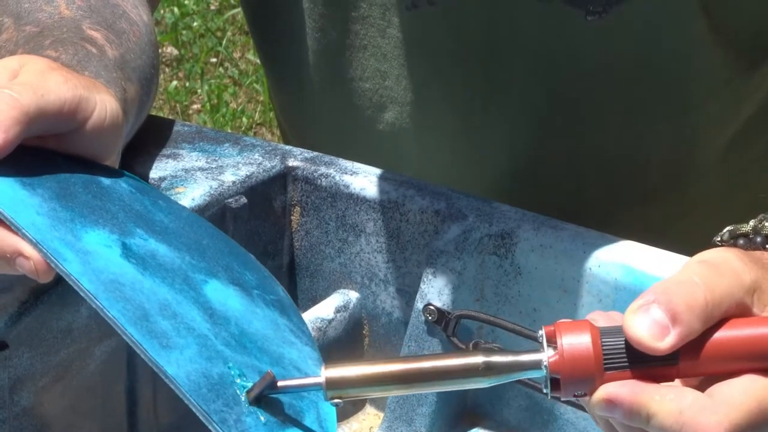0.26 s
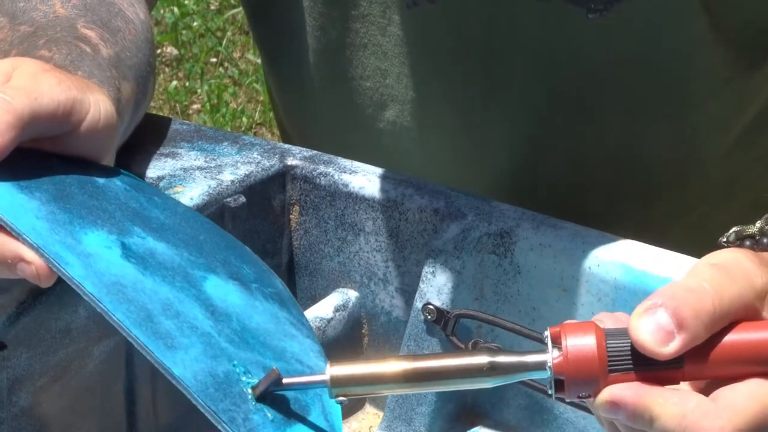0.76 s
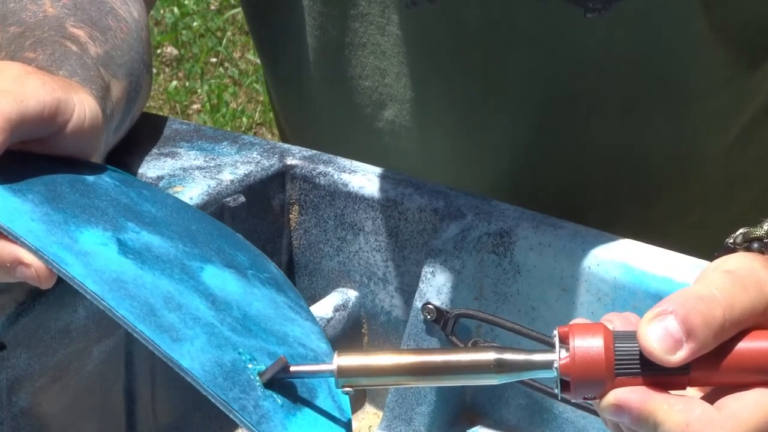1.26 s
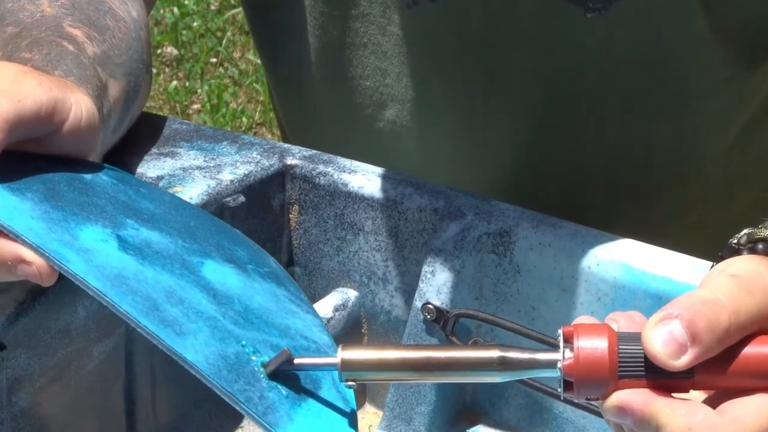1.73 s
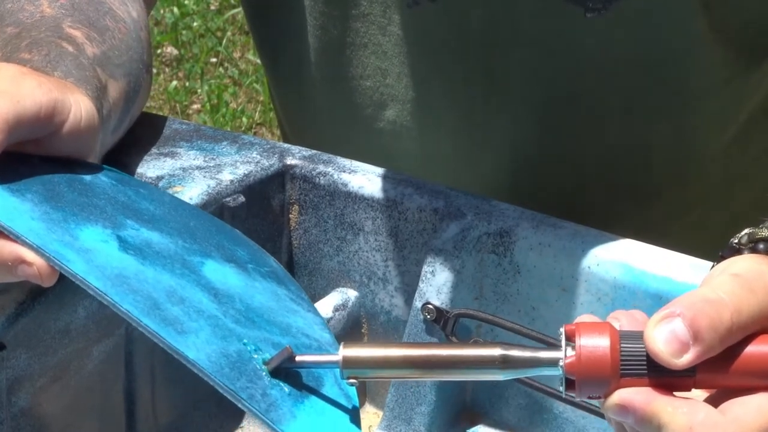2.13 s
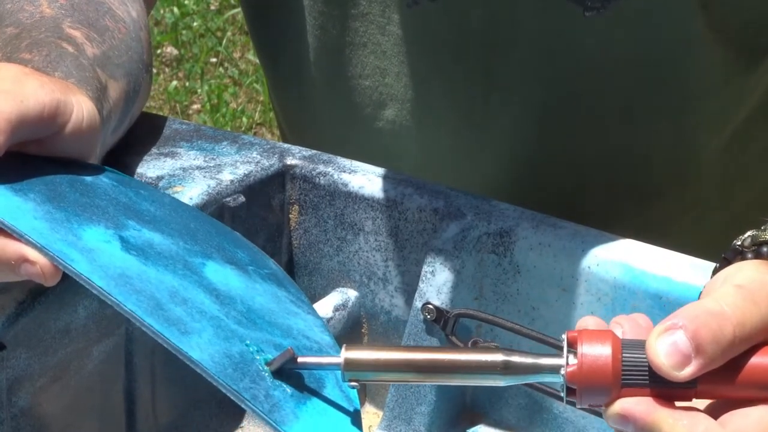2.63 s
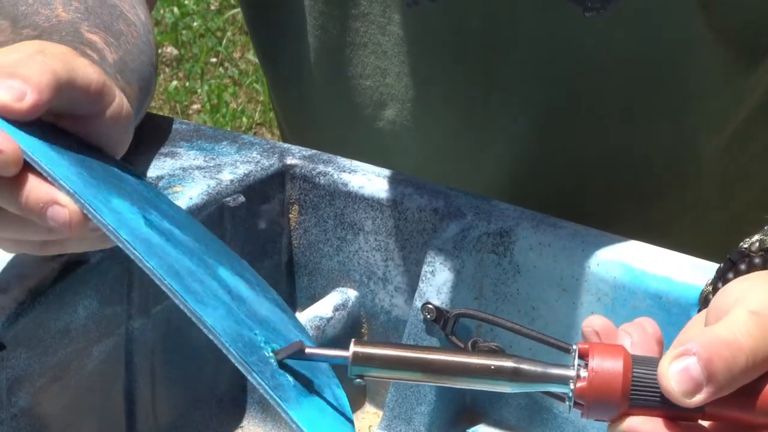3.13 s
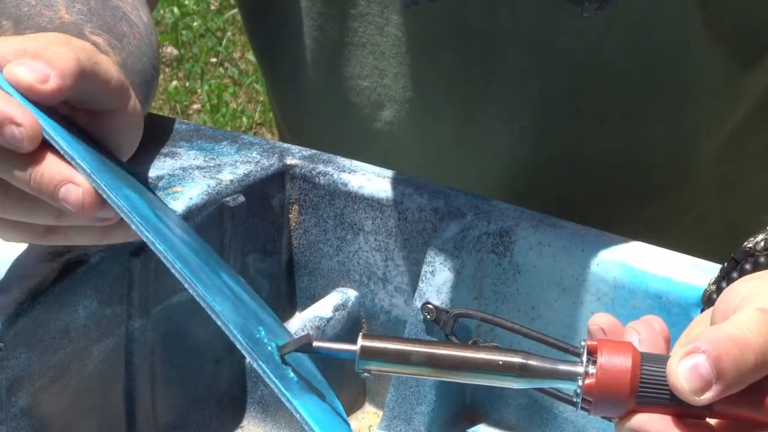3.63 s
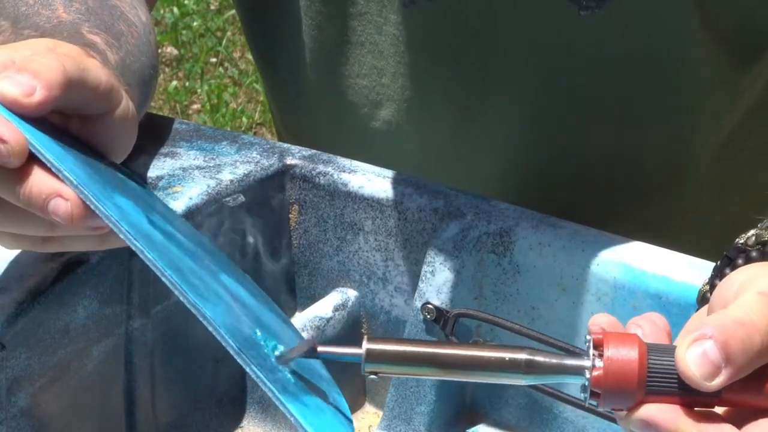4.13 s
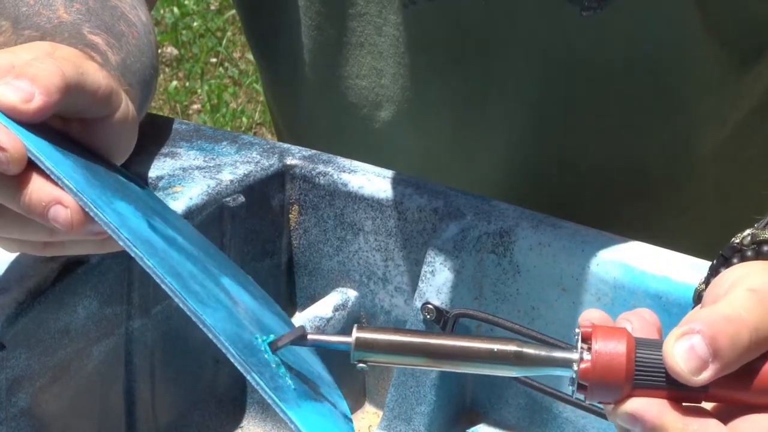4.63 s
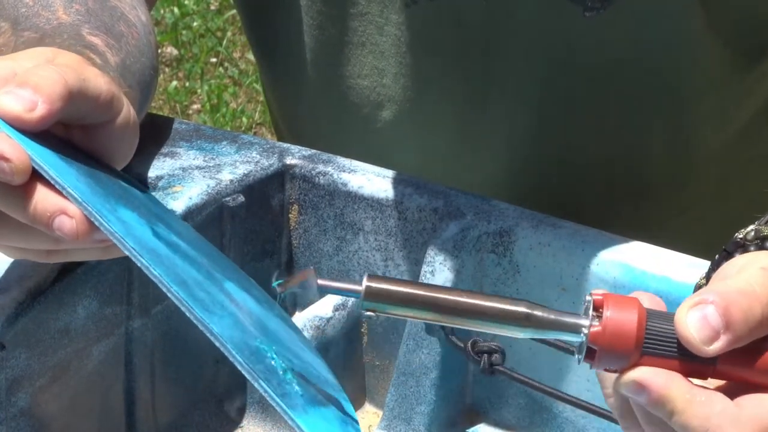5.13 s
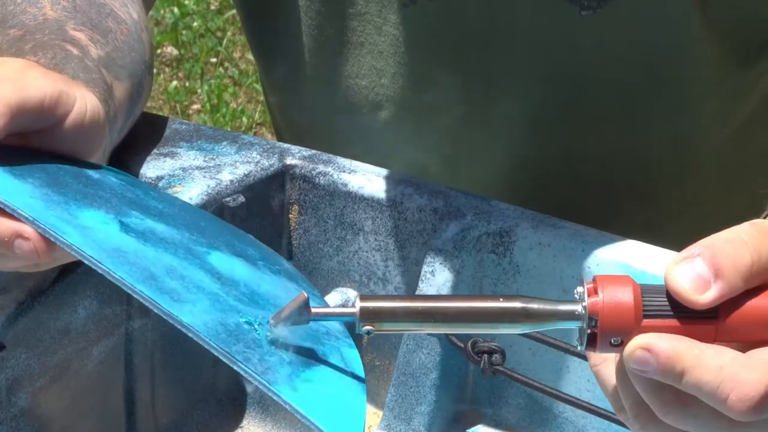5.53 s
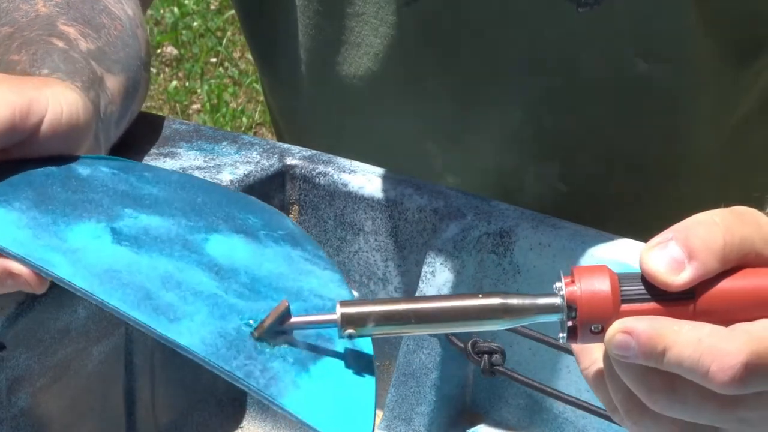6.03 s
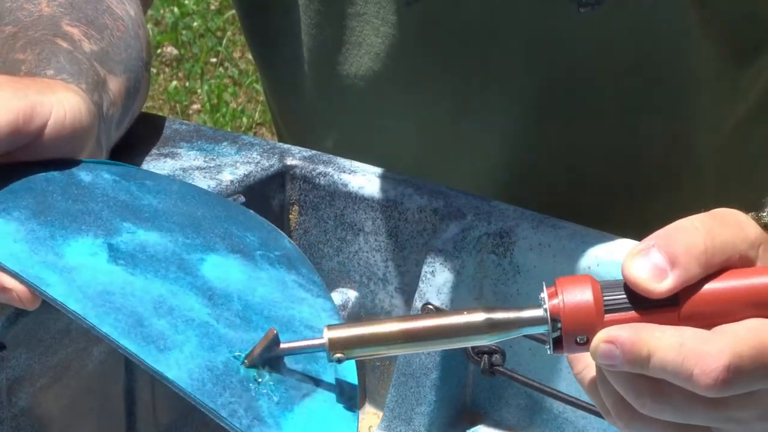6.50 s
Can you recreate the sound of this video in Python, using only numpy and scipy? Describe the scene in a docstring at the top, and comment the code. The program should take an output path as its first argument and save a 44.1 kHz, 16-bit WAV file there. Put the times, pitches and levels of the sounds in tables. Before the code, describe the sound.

Lively bird song echoes softly among trees over a faint leafy wash, interrupted once by a hard, close snap mid-way.

```python
"""Songbirds round a quiet yard

Songbirds call from trees round a yard where someone works on a plastic panel with a soldering iron, itself unheard.
Slurred whistles, chips and trills are gliding tones, each with a direct path, one reflection and tree echoes.
One sharp click close by is a set of damped modes with a noise crack; the hands' soft bumps are dull noise pulses.
Faint lower calls come from far away, over shaped noise for leaves and far-off sound."""
import sys
import numpy as np
from scipy import signal
from scipy.fft import rfft, irfft
from scipy.io import wavfile

SR = 44100
rng = np.random.default_rng(int(sys.argv[2]) if len(sys.argv) > 2 else 0)


def bounce(signal):
    """Save signal as a 16-bit WAV file at the path given by the first command-line argument."""
    frames = np.transpose(np.atleast_2d(signal))
    limited = np.clip(frames, -1, 1)
    pcm = np.round(limited * 32767).astype(np.int16)
    wavfile.write(sys.argv[1], SR, pcm)


N = 298102  # samples

FREQS = np.maximum(np.arange(N // 2 + 1) * SR / N, 1)  # Hz
SIDES = np.array([[1], [-1]])  # left and right sign of the side signal
# pitch unsteadiness of the song, as a share of the pitch, for a direct path of 0 dB
SONG_WARBLE = 0.025
LARGE_BIRD_BELOW_HZ = 3800


def undb(db):
    """Decibels to gain."""
    return 10 ** (np.asarray(db) / 20)


def unit(x):
    """Scale to rms 1."""
    return x / np.sqrt(np.mean(x ** 2))


def add(track, s, x):
    """Mix x into the track at s seconds."""
    i = max(int(s * SR), 0)
    track[i:i + len(x)] += x[:max(N - i, 0)]


def colour(x, points):
    """Filter by a spectrum of (f/Hz, level/dB) points, interpolated over log frequency."""
    hz, db = np.transpose(points)
    gain = undb(np.interp(np.log(FREQS), np.log(hz), db))
    return irfft(rfft(x) * gain, N)


def walk(rate):
    """Smooth chance with rms 1, changing about rate times a second."""
    slow = rfft(rng.standard_normal(N)) / (1 + (FREQS / rate) ** 4)
    return unit(irfft(slow, N))


def stereo(mid, side, pan_db):
    """Left and right as the microphone spreads them: least near 1.5 kHz, most round 5 to 7 kHz."""
    # stereo width of the microphone: f/Hz, side gain/dB
    width_curve = [(300, -1), (1500, -11), (2600, -5), (3600, -2.5), (4800, 3), (7000, 4), (10000, -7)]
    return (mid + SIDES * colour(side, width_curve)) * undb(SIDES * pan_db / 2)


def trees(x, early_t60, late_t60, late_db):
    """Mid and side echoes: strong ones from trunks nearby, then a weak tail from further off (t60 in s)."""
    t = np.arange(SR) / SR
    early = undb(-60 * t / early_t60)
    late = undb(late_db - 60 * t / late_t60)
    fade = (early + late) * (1 - np.exp(-t / 0.0009))
    # cubing the noise makes a few echoes stand out
    echoes = rng.standard_normal((2, SR)) ** 3 * fade
    echoes /= np.sqrt(np.sum(echoes ** 2, axis=1, keepdims=True))
    return signal.fftconvolve(x[None], echoes, axes=1)[:, :N]


def birds(notes, warble_rate, flutter_db, edge_s, echo_db, early_t60, late_t60, late_db, side_db, pan_db):
    """Each note is one gliding, warbled tone; foliage shades its direct path apart from its echoes."""
    wall_s, wall_db = 0.017, -16  # one distinct reflection from a surface nearby
    sung, direct = np.zeros(N), np.zeros(N)
    unsteady = walk(warble_rate)
    flutter = undb(flutter_db * walk(59))
    for s, slur_hz, db, direct_db, warble in notes:
        t = np.arange(len(slur_hz)) / SR
        at = (int(s * SR) + np.arange(len(t))) % N
        phase = 2 * np.pi * np.cumsum(slur_hz * (1 + warble * unsteady[at])) / SR
        swell = np.sin(np.pi / 2 * np.clip(np.minimum(t, t[::-1]) / edge_s, 0, 1))
        note = undb(db) * unit(swell * flutter[at] * np.sin(phase))
        add(sung, s, note)
        add(direct, s, note * undb(direct_db))
        add(direct, s + wall_s, note * undb(wall_db))
    mid, side = undb(echo_db) * trees(sung, early_t60, late_t60, late_db)
    return stereo(direct + mid, undb(side_db) * direct + side, pan_db)


def swoops():
    """A swoop swells up to a crest, plunges and bends to its last pitch; the level follows the plunge."""
    climb_fade_db = 15.5  # how much softer a swoop starts than its crest
    plunge_shape = 1.424  # 1 = sharp corner at the crest, 2 = round shoulder
    # main syllables: crest t/s, climb/s, roundness of the climb (1 = straight), first f/Hz, crest f/Hz,
    # trough f/Hz, end f/Hz, plunge/s, crest to end/s, crest level/dB, tail level/dB, direct path/dB
    swoop_rows = [ (0.31, 0.039, 2.2, 3560, 3520, 2383, 2740, 0.012, 0.082, -56.5, -56, 3.5),
                  (0.891, 0.027, 1.2, 2954, 3780, 1880, 2437, .02, 0.105, -50, -56, 3.5),
                  (1.048, .022, 1.26, 2110, 3080, 2452, 2454, .008, 0.086, -54.5, -60, 8),
                  (1.263, 0.025, 1.67, 2746, 2623, 2008, 1972, 0.014, 0.071, -49.5, -59.5, 4),
                  (2.088, 0.031, 2.6, 2348, 3387, 2175, 2310, 0.014, 0.12, -48.5, -57.5, 5.5),
                  (2.472, .014, 2.2, 3940, 3835, 2345, 2893, 0.015, 0.12, -51, -55.5, 1),
                  (3.243, 0.0077, 2, 3160, 3204, 2146, 2644, 0.019, .104, -48, -56, 2),
                  (3.404, .04, 1.8, 2243, 3620, 2946, 2920, 0.00583, 0.058, -54, -47.5, 4),
                  (4.503, .008, 1.5, 3220, 3450, 2167, 2090, .016, 0.026, -51, -51.5, 2),
                  (5.303, 0.023, 1.8, 2687, 3420, 2220, 2450, 0.021, 0.092, -50.5, -54.5, 1),
                  (5.5, 0.019, 2.2, 2745, 3220, 2837, 2960, 0.0117, 0.1254, -48.5, -60.5, 3.5),
                  (6.421, 0.0081, 1.9, 3760, 3400, 2557, 2560, 0.0096, 0.105, -47, -56, -1.5)]
    notes = []
    for (s, climb_s, roundness, first_hz, crest_hz, trough_hz, end_hz,
         plunge_s, length, crest_db, tail_db, direct_db) in swoop_rows:
        t = np.arange(int((climb_s + length) * SR)) / SR - climb_s
        to_climb = np.maximum(-t, 0) / climb_s
        after = np.maximum(t, 0)
        height = np.exp(-(after / plunge_s) ** plunge_shape)
        tail_hz = trough_hz + (end_hz - trough_hz) * (after / length) ** 2
        climb_hz = (first_hz - crest_hz) * to_climb ** roundness
        slur_hz = tail_hz + (crest_hz - tail_hz) * height + climb_hz
        db = tail_db + (crest_db - tail_db) * height - climb_fade_db * to_climb
        notes.append((s - climb_s, slur_hz, db, direct_db, SONG_WARBLE * undb(-direct_db)))
    return notes


def slurs(rows, ease, warble):
    """Single glides leave their first pitch quickly and ease into the last; hidden birds sound rougher."""
    notes = []
    for s, length, start_hz, end_hz, db, direct_db in rows:
        to_go = np.linspace(1, 0, int(length * SR)) ** ease
        slur_hz = end_hz + (start_hz - end_hz) * to_go
        notes.append((s, slur_hz, db, direct_db, warble * undb(-direct_db)))
    return notes


def trills(large_bird, swing_db=2.5, warble=0.012):
    """Buzzy runs of tiny down-strokes saw the pitch unevenly, loudest as each fall reaches the bottom."""
    # trills: t/s, length/s, centre f/Hz, sweep/Hz, mean strokes per second, level/dB, direct path/dB
    trill_rows = [ (0.306, 0.055, 2560, 755, 95, -53, 1), (0.626, 0.026, 3880, 646, 92, -50, -4),
                  (0.683, 0.044, 4380, 1410, 55, -55.5, -1), (3.208, 0.03, 4040, 800, 75, -58, -1),
                  (3.316, .04, 4600, 696, 57, -60, -2), (4.356, 0.045, 3306, 794, 80, -52, 0),
                  (4.367, 0.05, 4310, 880, 61, -60, -3), (4.44, 0.051, 3118, 1140, 70, -51.5, -3),
                  (4.488, 0.032, 4460, 1000, 57, -59, -3), (4.596, 0.035, 4550, 905, 57, -59, -2),
                  (4.703, 0.045, 4590, 500, 57, -57, 0.5), (5.532, 0.025, 2884, 350, 90, -59, 4),
                  (6.276, 0.07, 3626, 800, 54, -56, -6), (6.35, .034, 4520, 700, 69, -55, -2),
                  (6.457, 0.048, 2770, 520, 81, -57.5, 4)]
    notes = []
    pace = undb(0.53 * walk(30))
    for s, length, hz, sweep_hz, rate, db, direct_db in trill_rows:
        # low trills are the large bird's, high ones the small birds'
        if (hz < LARGE_BIRD_BELOW_HZ) != large_bird:
            continue
        phase = 2 * np.pi * np.cumsum(rate * pace[int(s * SR):][:int(length * SR)]) / SR
        # a fifth of each stroke rises, the rest falls
        slur_hz = hz + sweep_hz / 2 * signal.sawtooth(phase, .2)
        notes.append((s, slur_hz, db + swing_db * np.cos(phase), direct_db, warble))
    return notes


def song():
    """The large bird's song joins swoops, plain slurs and low trills, ringing among the trunks."""
    # the song's plain glides, some alone, some close to swoops, some doubled by strong reflections:
    # t/s, length/s, start f/Hz, end f/Hz, level/dB, direct path/dB
    slur_rows = [ (0.0, 0.036, 3230, 2750, -54, -3), (0.282, 0.024, 3400, 2450, -57, -0.5),
                 (0.395, 0.095, 2780, 2890, -60.5, 8), (0.647, 0.012, 4300, 2920, -51.5, 2.5),
                 (0.659, 0.028, 3950, 3120, -60, 9), (0.815, 0.023, 2955, 3145, -52.5, -1.5),
                 (0.836, 0.022, 3000, 2460, -53, 0), (0.865, 0.02, 3020, 3400, -54, -0.5),
                 (0.887, 0.023, 3734, 3725, -58.5, 9.5), (1.867, 0.027, 2916, 3514, -55.5, 2),
                 (1.903, 0.017, 3400, 3620, -57, 0), (2.028, 0.033, 2370, 2680, -54, 3),
                 (2.416, 0.035, 2930, 2910, -60, 0), (2.438, 0.024, 4065, 3550, -58, 4),
                 (2.451, 0.036, 3245, 2353, -50, 0), (2.57, 0.042, 2844, 2890, -51, -1),
                 (3.148, 0.025, 3500, 2760, -51, -3.5), (3.174, 0.018, 2850, 3290, -55.5, 2.5),
                 (3.19, 0.029, 3550, 3860, -53.5, -5), (3.231, 0.047, 4500, 3510, -56, 0),
                 (3.276, 0.018, 3650, 3080, -56, 4), (3.378, 0.017, 3020, 3260, -51, 1),
                 (3.454, 0.022, 2810, 2810, -53, 5.5), (3.49, 0.09, 2930, 3130, -60, 0.5),
                 (3.731, 0.024, 2910, 2796, -47, -1.5), (4.099, 0.068, 2660, 3157, -55.5, 3.5),
                 (4.165, 0.051, 3166, 3134, -54.5, 3.5), (4.361, 0.038, 3140, 2630, -53, 2.5),
                 (4.389, 0.017, 3350, 3100, -52.5, 7), (4.456, 0.017, 2570, 3100, -51.5, 3),
                 (4.483, 0.0098, 2550, 3100, -52, 1), (4.524, 0.065, 2650, 3900, -53, -2.5),
                 (5.215, 0.043, 3600, 3870, -58.5, -2), (5.25, 0.025, 3650, 2684, -50.5, -4.5),
                 (5.283, 0.014, 2700, 3310, -51.5, 1), (5.435, 0.047, 2520, 2850, -52.5, -3.5),
                 (5.993, 0.019, 2565, 2390, -55, 3.5), (6.017, 0.02, 2370, 2220, -58, 4),
                 (6.042, 0.02, 2376, 2570, -59, 6), (6.28, 0.075, 3280, 3300, -63, -1),
                 (6.515, 0.083, 2620, 2680, -71, -5)]
    notes = swoops() + slurs(slur_rows, ease=1.3, warble=SONG_WARBLE) + trills(large_bird=True)
    return birds(notes, warble_rate=310, flutter_db=1.0, edge_s=0.0035, echo_db=1.3,
                 early_t60=0.7, late_t60=1.74, late_db=-5.5, side_db=-16.0, pan_db=0.0)


def whistles():
    """A thin whistle swells and fades while its pitch creeps up a little."""
    rise_per_s = .15  # share of the pitch
    fade_db = 9  # how much softer the ends are than the middle
    # whistles of smaller birds: t/s, length/s, middle f/Hz, level/dB, warble [share of pitch], direct path/dB
    whistle_rows = [ (0.0, 0.039, 6120, -55.5, 0.074, -3.5), (0.51, 0.1, 4900, -56, 0.012, 5),
                    (0.704, 0.091, 5810, -59, 0.022, -0.5), (1.699, 0.13, 6800, -59.5, 0.02, -4),
                    (1.817, 0.095, 6860, -62.5, .02, -2), (1.914, 0.096, 6970, -63.5, 0.023, 1),
                    (2.041, 0.067, 5440, -57.5, 0.027, -.5), (2.126, 0.058, 5320, -63, 0.011, 1),
                    (2.334, 0.091, 7320, -70.5, 0.0076, -.5), (2.887, 0.16, 5460, -60.5, 0.023, -4.5),
                    (3.607, 0.05, 4850, -57, 0.045, -1)]
    notes = []
    for s, length, hz, db, warble, direct_db in whistle_rows:
        along = np.linspace(-1, 1, int(length * SR))
        slur_hz = hz * (1 + rise_per_s * length * along / 2)
        notes.append((s, slur_hz, db - fade_db * along ** 2, direct_db, warble))
    return notes


def twitter():
    """Smaller birds mix thin whistles, rough chips and high trills, set wide and to one side."""
    # rough, steep chips: t/s, length/s, start f/Hz, end f/Hz, level/dB, direct path/dB
    chip_rows = [ (1.906, 0.025, 4430, 4500, -54.5, 1.5), (1.961, 0.032, 4760, 3830, -50.5, -2),
                 (3.105, 0.025, 4600, 4850, -56.5, -2), (3.298, 0.016, 5210, 4230, -52.5, -6.5),
                 (3.63, 0.051, 5040, 6600, -59, -8.5), (3.68, 0.041, 4640, 3290, -53, -8.5),
                 (3.98, 0.06, 4420, 6190, -56.5, -9.5), (4.258, 0.0069, 5500, 3730, -48.5, 0),
                 (4.32, 0.039, 5130, 3990, -51, -6), (4.465, 0.016, 5330, 4300, -52.5, -2),
                 (4.575, 0.0192, 5170, 4360, -52, -4), (5.722, 0.04, 3900, 3200, -59, -1),
                 (5.82, 0.033, 3300, 4830, -53, -5), (5.853, 0.026, 3310, 5230, -56, -0.5),
                 (6.338, 0.023, 3280, 4730, -52, -3), (6.705, 0.039, 5720, 3650, -56.5, -8)]
    notes = whistles() + slurs(chip_rows, ease=1.2, warble=0.023) + trills(large_bird=False)
    return birds(notes, warble_rate=286, flutter_db=2.5, edge_s=0.0042, echo_db=-4.0,
                 early_t60=0.87, late_t60=1.4, late_db=-8.0, side_db=-0.5, pan_db=-5.5)


def click(db, rise_s, crack_db, crack_t60, pan_db, side_db, near_db, near_t60, yard_db):
    """A hard snap cracks, rings damped modes, bounces between near surfaces and dies away in the yard."""
    # what the click rings with: f/Hz, width/Hz, relative spectral peak level/dB
    mode_rows = [(342, 64, -12), (634, 76, -8), (730, 24, -1.5), (806, 180, 7), (1220, 36, 4),
                 (1280, 110, 6), (1450, 42, -3), (1725, 28, 0), (1850, 610, 16.5), (2200, 64, 6),
                 (2880, 250, -10), (4450, 240, -10), (6040, 240, -11)]
    # the catch, the snap, its chatter and a last rebound: t/s, level relative to the snap/dB
    contact_rows = [(3.8182, -16), (3.8189, 0), (3.8206, -15), (3.8229, -15), (3.8337, -19)]
    t = np.arange(SR // 10) / SR
    ring = np.zeros(len(t))
    for hz, width, mode_db in mode_rows:
        ring += undb(mode_db) * width * np.exp(-np.pi * width * t) * np.cos(2 * np.pi * hz * t)
    ring *= 1 - np.exp(-t / rise_s)  # the vibration takes a moment to spread through the part
    ring /= np.abs(ring).max()
    snap, burst = np.zeros(N), np.zeros(N)
    for s, size_db in contact_rows:
        add(snap, s, undb(db + size_db) * ring)
        add(burst, s, undb(crack_db + size_db - 60 * t / crack_t60))
    # a small part radiates little bass
    snap = signal.sosfilt(signal.butter(3, 560, "high", fs=SR, output="sos"), snap)
    # its many high modes merge into a brief crack
    crack_curve = [(1500, -30), (3500, -7), (6500, 11), (8000, -16), (11000, -15)]
    crack = burst * unit(colour(rng.standard_normal((2, N)), crack_curve))
    near = undb(near_db) * trees(snap, near_t60, .2, -44)
    yard = undb(yard_db) * trees(snap, 0.39, 0.69, -8)
    mid, side = near + yard
    return stereo(snap + crack[0] + mid, undb(side_db) * snap + crack[1] / 2 + side, pan_db)


def hands():
    """Dull, soft bumps while the panel is held: low noise under smooth pulses."""
    # bumps of the hands on the panel: t/s, length/s, level at the top of the pulse/dB
    bump_rows = [(0.614, 0.057, -82), (0.817, 0.077, -74.5), (1.048, 0.047, -78), (1.18, 0.29, -79.5),
                 (1.958, 0.072, -81), (5.576, 0.24, -84.5)]
    push = np.zeros(N)
    for s, length, db in bump_rows:
        add(push, s, undb(db) * np.hanning(int(length * SR)))
    dull_curve = [(25, -14), (70, -1.5), (130, 2.5), (220, -5.0), (500, -39)]
    return push * unit(colour(rng.standard_normal(N), dull_curve))


def far_calls():
    """Faint lower calls from far away, slow at the edges, with more echo than near ones."""
    # far calls: t/s, length/s, start f/Hz, end f/Hz, level/dB, direct path/dB
    far_rows = [ (0.745, 0.1, 679, 645, -67.5, 9), (0.815, 0.08, 620, 558, -75, 7),
                (2.34, 0.044, 1840, 1633, -66, 5), (4.62, 0.37, 1630, 1729, -66.5, -5.5)]
    notes = slurs(far_rows, ease=1.19, warble=0.0194)
    return birds(notes, warble_rate=140, flutter_db=2.0, edge_s=0.04, echo_db=4.0,
                 early_t60=1.0, late_t60=1.0, late_db=-10, side_db=-18, pan_db=0.5)


def air(side_db, flicker_db, pan_db):
    """Leaves and far-off noise: a steady wash with a slight flicker."""
    # background shared by both sides: f/Hz, relative level per Hz/dB
    mid_curve = [(15, -73), (25, -36), (121, -37), (266, -21.5), (352, -15.5), (631, -9), (699, -7.5),
                 (774, -4), (1460, -5), (1660, -4.5), (2140, -4), (2830, -0.5), (3740, -9.5), (4040, -9),
                 (10900, -28), (14200, -107), (22000, -120)]
    # background differing between the sides: f/Hz, relative level per Hz/dB
    side_curve = [(15, -68), (25, -67), (246, -24.5), (370, -17), (556, -8.5), (616, -9), (901, -4),
                  (1100, -3.5), (1320, -3), (1880, -4), (2140, -2.5), (2830, 0), (3560, -3.5), (6380, -8),
                  (10900, -22), (14200, -46), (22000, -120)]
    # hollows nearby colour the background: f/Hz, width/Hz, boost or cut/dB
    hollow_rows = [(117, 15.4, 13), (406, 16, 4), (703, 66, 2), (880, 39, 1.5), (1924, 280, 2.5),
                   (2820, 680, -5)]
    boost_db = sum(db / (1 + (2 * (FREQS - hz) / width) ** 2) for hz, width, db in hollow_rows)

    def wash(curve):
        """Noise with the given spectrum, coloured by the hollows."""
        noise = colour(rng.standard_normal(N), curve)
        return unit(irfft(rfft(noise) * undb(boost_db), N))

    mid, side = wash(mid_curve), wash(side_curve)
    level_db = -55.5 + flicker_db * walk(21)
    return (mid + SIDES * undb(side_db) * side) * undb(level_db + SIDES * pan_db / 2)


def scene():
    """Birds near and far, the click and the hands over the background."""
    snap = click(db=-10.5, rise_s=0.0004, crack_db=-45.5, crack_t60=0.017, pan_db=1.0,
                 side_db=-18, near_db=-10.5, near_t60=0.066, yard_db=-16.0)
    background = air(side_db=-3.5, flicker_db=0.58, pan_db=0.7)
    return song() + twitter() + snap + hands() + far_calls() + background


def record(dry):
    """The recorder cuts the top steeply above 11 kHz."""
    return signal.sosfilt(signal.ellip(10, .2, 60, 11000, fs=SR, output="sos"), dry)


dry = scene()
out = record(dry)
bounce(out)
```